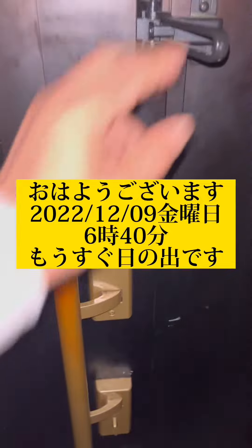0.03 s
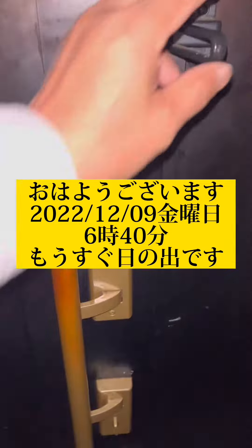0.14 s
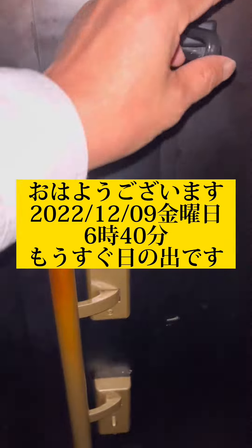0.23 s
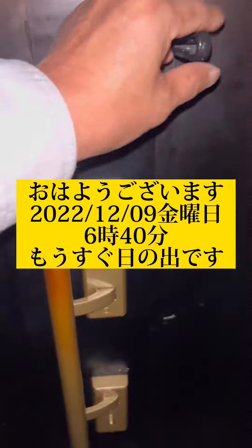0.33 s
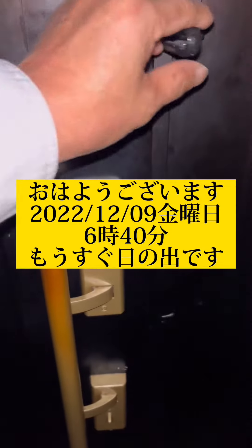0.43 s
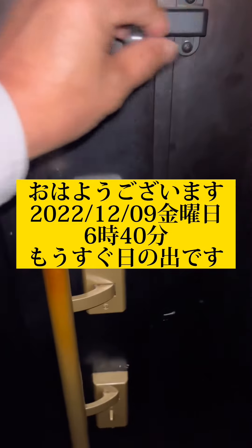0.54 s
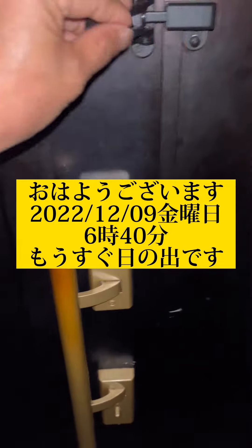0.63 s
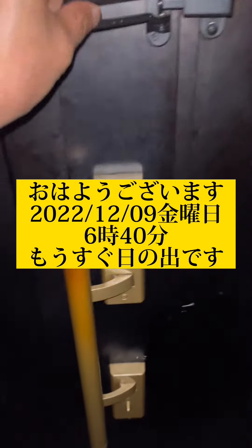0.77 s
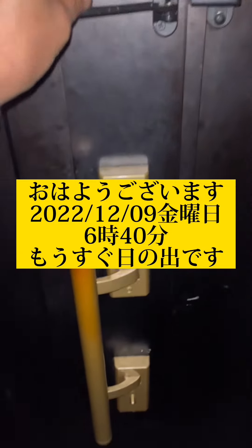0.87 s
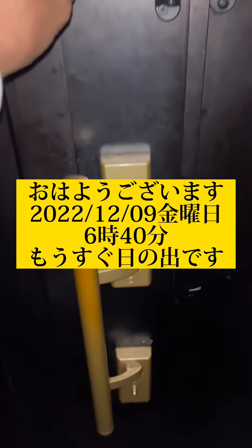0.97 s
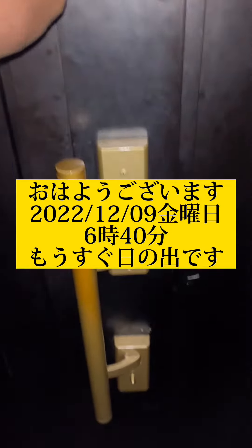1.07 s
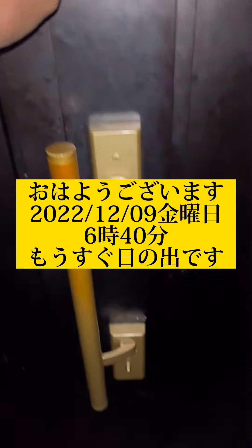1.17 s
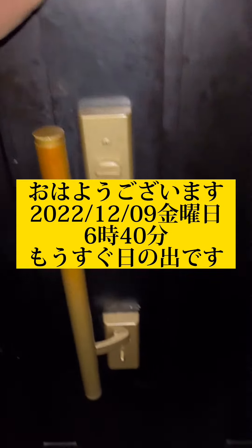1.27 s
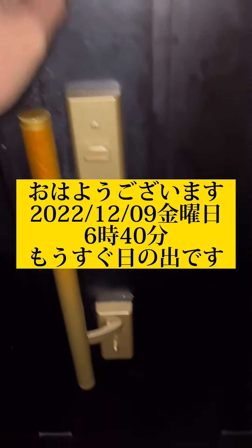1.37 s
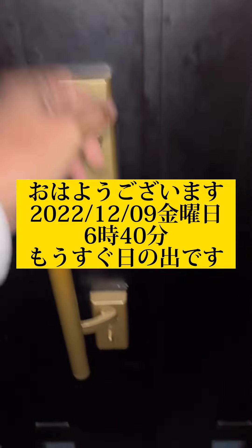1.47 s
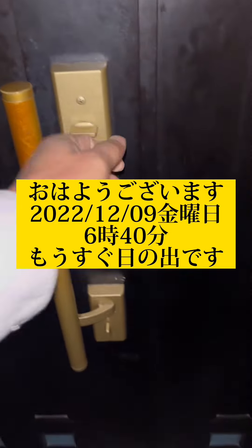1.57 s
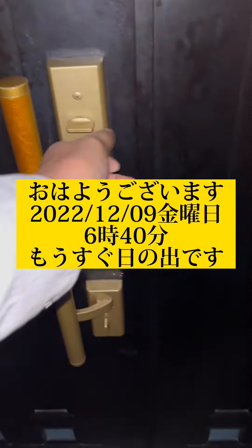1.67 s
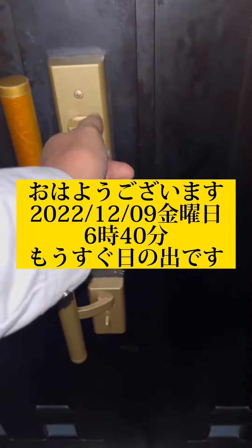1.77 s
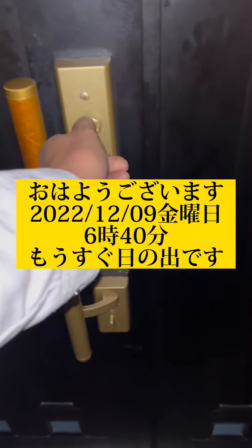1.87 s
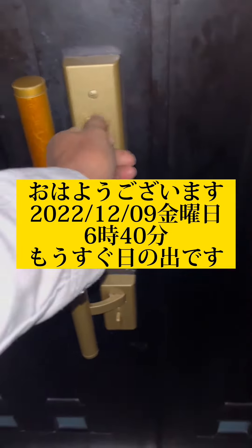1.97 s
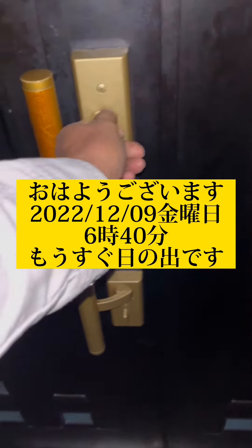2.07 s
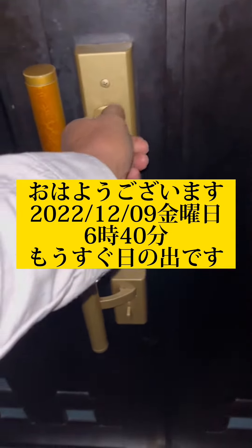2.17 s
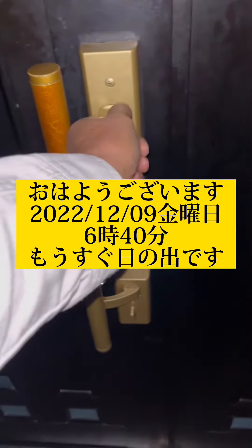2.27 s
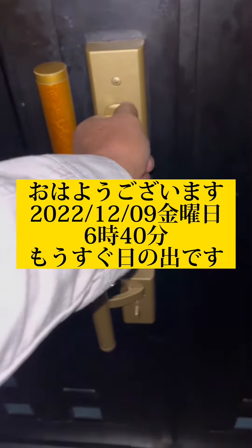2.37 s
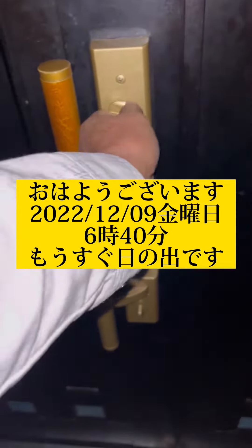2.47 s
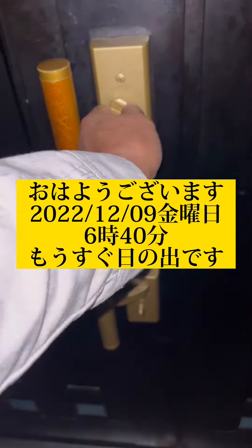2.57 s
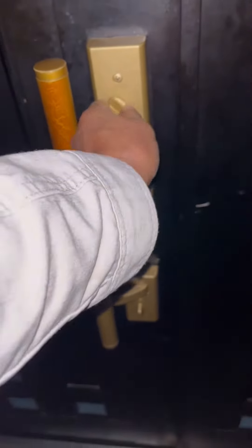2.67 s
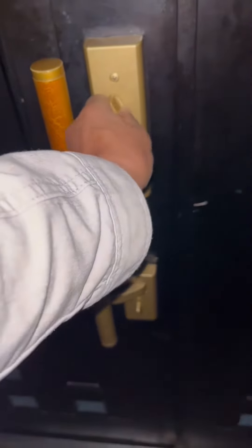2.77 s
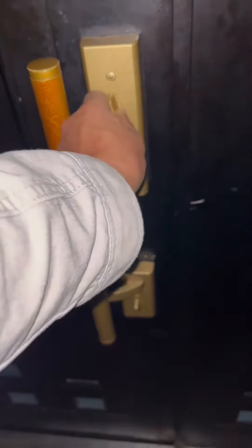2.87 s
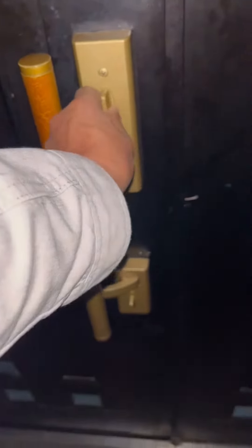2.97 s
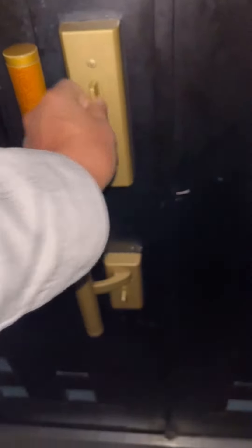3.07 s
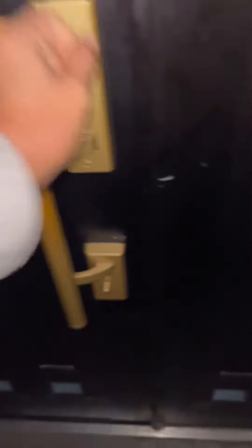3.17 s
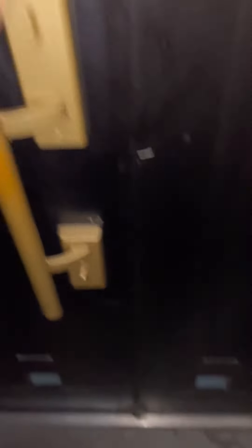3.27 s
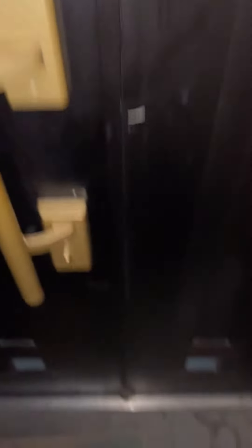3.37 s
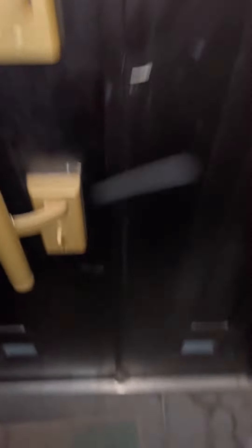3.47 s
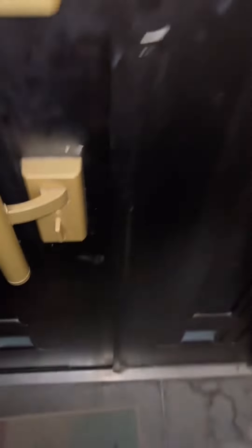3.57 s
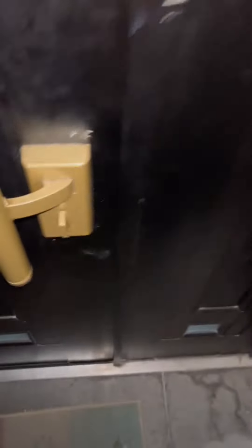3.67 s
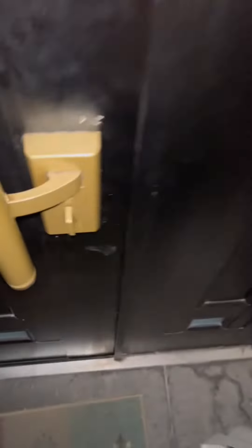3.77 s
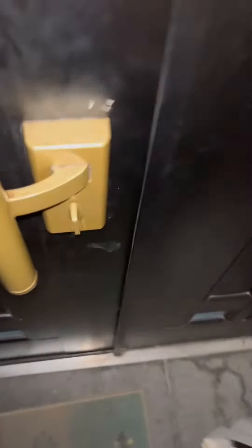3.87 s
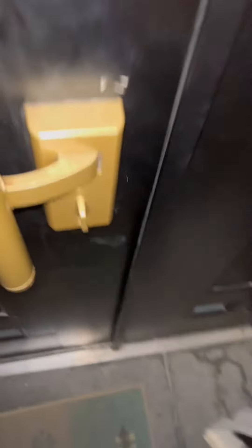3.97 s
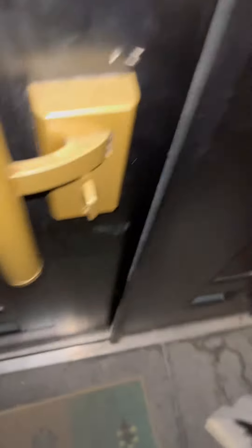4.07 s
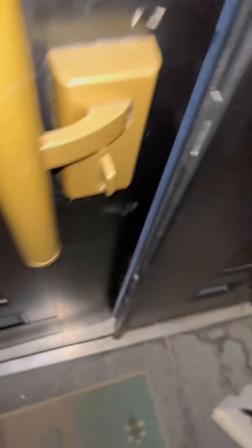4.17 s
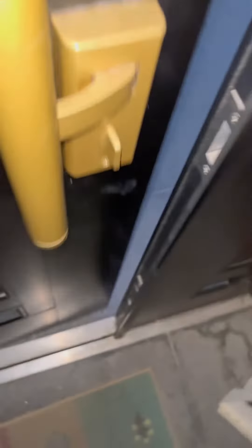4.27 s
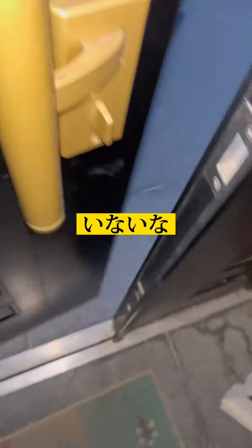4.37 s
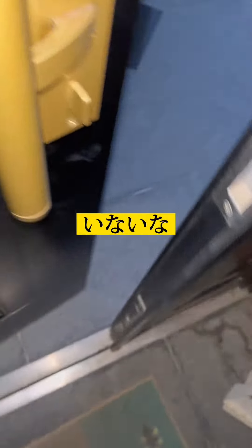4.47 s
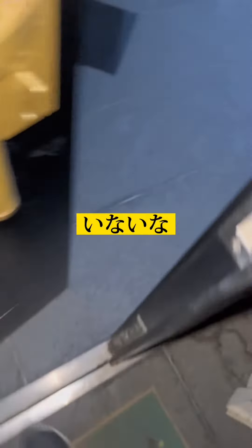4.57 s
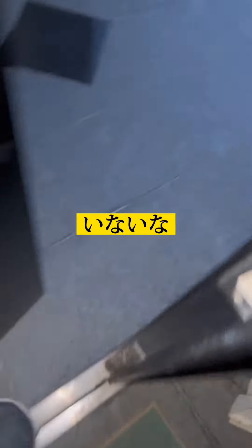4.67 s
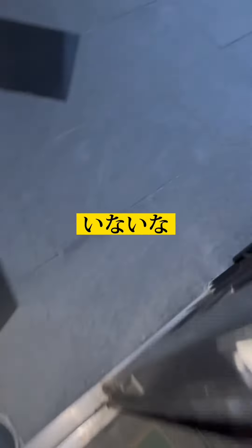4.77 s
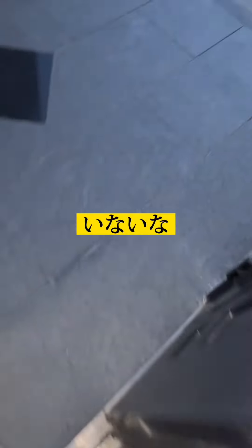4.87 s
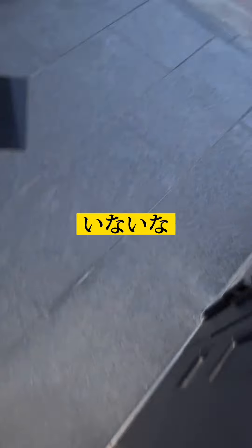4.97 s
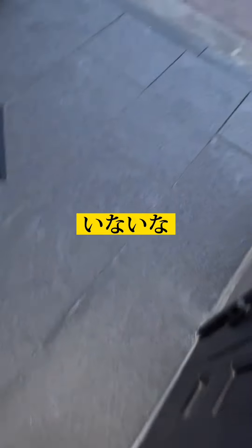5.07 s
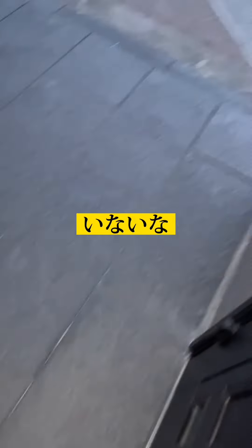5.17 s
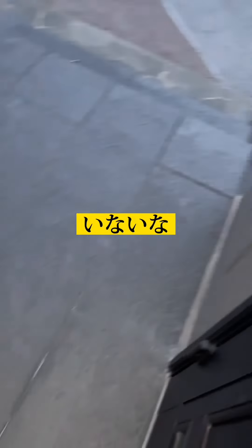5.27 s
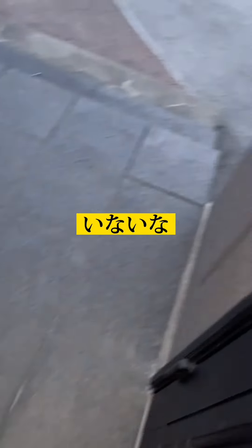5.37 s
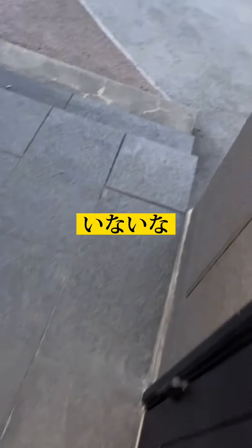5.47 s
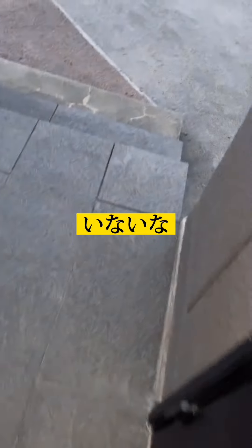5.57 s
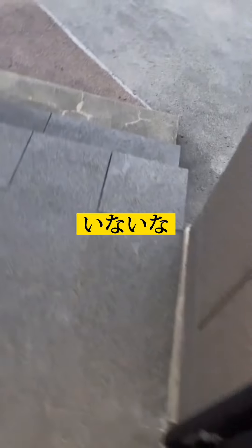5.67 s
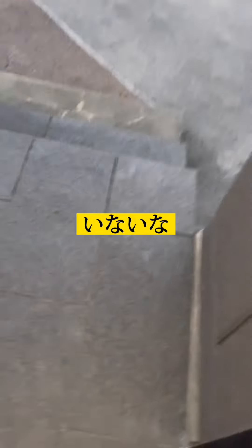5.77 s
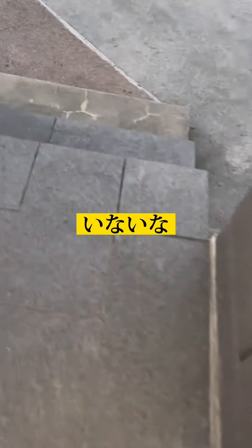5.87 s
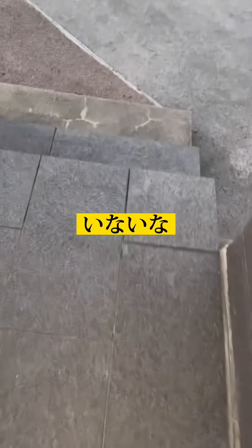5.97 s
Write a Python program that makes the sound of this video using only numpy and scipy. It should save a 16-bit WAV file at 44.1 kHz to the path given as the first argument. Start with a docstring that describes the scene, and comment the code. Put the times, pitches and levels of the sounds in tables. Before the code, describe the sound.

In a small hard entrance hall, heard close, fabric softly hisses and a swing guard knocks with a short ring. A thumb-turn ticks faintly and its bolt cracks home brightly. The handle clacks and rattles, a latch snaps with a heavy door thump, another latch springs back. Clothes swish, a hinge rubs dully, and low outdoor rumble is joined by a faint steady hum.

```python
"""A metal front door is unlocked and opened from a small, hard entrance hall.
The swing guard knocks back, the thumb-turn throws the bolt, the handle takes up its slack, the latches snap free.
Each blow is a bright crack, a dense noise tail and, for the larger parts, decaying modes; dragging is filtered noise.
The door leaf rumbles and thumps and its hinge rubs; clothes hiss and swish as noise that swells and dies away.
Outdoor rumble grows through the opening door, and a steady hum, a slowly wavering sine, sets in."""
import sys
import numpy as np
from scipy import signal
from scipy.fft import rfft, irfft
from scipy.io import wavfile
from scipy.ndimage import uniform_filter1d

SR = 44100
rng = np.random.default_rng(int(sys.argv[2]) if len(sys.argv) > 2 else 0)


def output_pcm(signal):
    """Save a mono or channel-first signal as 16-bit PCM at the path in sys.argv[1].

    Samples are clipped to [-1, 1] before scaling.
    """
    pcm = np.clip(np.atleast_2d(signal).T, -1, 1) * 32767
    wavfile.write(sys.argv[1], SR, np.round(pcm).astype(np.int16))


N = 265393
T = np.arange(N) / SR  # scene time, s
AGE = T[:SR * 3 // 4]  # time since a blow, s

# Spectra give relative density; modes give relative level. Both are scaled to rms 1 before use.

# Reverberation of the hall, before each blow's ring factor: frequency_hz, t60_s
HALL_T60 = [(100, 0.5), (300, 0.32), (700, 0.35), (2000, 0.23), (6000, 0.22), (10000, 0.15), (16000, 0.13)]

# Outdoor rumble: frequency_hz, density_db_per_hz
OUTDOOR_SPECTRUM = [(15, -84), (25, -8.5), (70, -1.5), (102, -6.5), (134, -6), (186, -10), (257, -8),
                    (307, -15.5), (574, -12), (667, -18), (1100, -18), (2930, -33), (3320, -28),
                    (10000, -48), (13000, -68), (22000, -120)]

# Soft hiss of fabric: frequency_hz, density_db_per_hz
FABRIC_HISS_SPECTRUM = [(59, -20.5), (100, 0.5), (239, -18.5), (389, -2.5), (705, -8), (950, -6.5),
                        (1580, -7.5), (2220, -10), (9210, -16), (14700, -22), (16000, -21)]
# Swish of clothes: frequency_hz, density_db_per_hz
SWISH_SPECTRUM = [(200, -10), (500, 1), (900, -6), (1400, 4), (2300, -0.5), (4000, -4.5), (8000, -15),
                  (16000, -30)]
# Swells and sustained stretches of soft fabric hiss: start_s, length_s, level_db
FABRIC_HISSES = [(-0.1, 0.27, -54), (0.77, 0.27, -67.5), (1.24, 0.31, -62.5), (1.59, 0.29, -58),
                 (1.95, 2.95, -65.5), (2.58, 0.33, -66), (3.1, 0.11, -62), (4.34, 0.2, -55.5),
                 (4.75, 0.75, -58), (5.6, 0.39, -72)]
# Swishes of clothes: start_s, length_s, level_db
SWISHES = [(3.295, 0.058, -55.5), (5.17, 0.065, -55), (5.26, 0.04, -49.5), (5.43, 0.2, -57.5),
           (5.785, 0.019, -50.5), (5.87, 0.15, -77)]

# Rub of the hinge: frequency_hz, density_db_per_hz
HINGE_SPECTRUM = [(80, -15), (170, -1), (300, -8.5), (517, 4), (700, -14), (920, -6.5), (1340, -19),
                  (2500, -34), (8000, -50)]
# Noise of the door leaf: frequency_hz, density_db_per_hz
LEAF_SPECTRUM = [(35, -46), (70, 15.5), (160, 11), (280, 3), (450, -2.5), (700, -34), (1500, -46)]
# Low rumbles of the door leaf, under the hand or stirred by a blow: start_s, length_s, level_db
LEAF_RUMBLES = [(0.34, 0.32, -68), (1.13, 0.29, -62.5), (2.41, 0.54, -66.5), (2.89, 0.17, -57.5),
                (3.58, 0.79, -48.5)]
# Dull thumps of the door leaf: start_s, level_db, pitch_hz
LEAF_THUMPS = [(3.701, -42, 114), (3.968, -32, 85.6), (3.979, -26.5, 159.3), (4.004, -32.5, 113),
               (4.247, -37, 273), (4.274, -32, 197), (4.301, -37, 106), (4.559, -31.5, 122),
               (4.581, -28, 79.3), (4.598, -32.5, 155), (4.629, -32.5, 77.5), (4.66, -40, 115),
               (5.56, -42.5, 265)]
# Soft bumps as the body shifts: start_s, level_db, pitch_hz
BODY_BUMPS = [(1.455, -54, 150), (3.205, -52, 118), (3.318, -52.5, 126), (3.41, -51.5, 101),
              (5.099, -39.5, 87)]

# Struck swing guard: frequency_hz, density_db_per_hz
GUARD_SPECTRUM = [(100, -41), (200, -11), (290, -4), (380, 3.5), (480, -6), (590, -14.5), (700, -7.5),
                  (860, -7), (980, -15), (1300, -14.5), (2100, -27), (2620, -15), (3050, -32), (3700, -29),
                  (7000, -41), (12000, -69)]
# Ringing of the guard: frequency_hz, level_db, t60_s
GUARD_MODES = [(280, -1.5, 0.94), (310, -12, 0.34), (379, 3, 0.44), (407, -1, 0.43), (685, -16, 0.22),
               (795, -20, .33), (1310, -10, 0.28), (1565, -14, 0.19), (2480, -5, 0.1), (2600, 7.5, 0.095),
               (2700, -2, 0.17)]

# Clack of the handle's linkage: frequency_hz, density_db_per_hz
LINKAGE_SPECTRUM = [(100, -13), (300, -6.5), (430, -10), (700, 1.5), (1050, -5), (1600, -12), (2250, -7),
                    (3300, -18), (4000, -18), (5000, -26.5), (7000, -29), (10000, -27), (12000, -43),
                    (16000, -47)]
# Ringing of the linkage: frequency_hz, level_db, t60_s
LINKAGE_MODES = [(687, -6, 0.28), (1037, -22, .15), (2200, -4, 0.093), (2450, -13, .1), (4270, -6, 0.057),
                 (5670, -11, 0.06), (6880, -7, 0.065), (7300, -11, 0.072), (9630, -7.5, 0.039)]
# Struck lock case: frequency_hz, density_db_per_hz
CASE_SPECTRUM = [(88, -36), (150, -31), (270, -1), (326, 1), (623, -2), (776, 0), (981, -13.5), (1120, -8),
                 (1280, -16), (1460, -9.5), (2260, -13.5), (5000, -23), (6500, -24), (11000, -120)]
# Ringing of the lock case: frequency_hz, level_db, t60_s
CASE_MODES = [(280.5, -0.5, 0.23), (477, -2, 0.3), (404, -5, 0.2), (587, -7.5, 0.4), (777, -6, 0.15),
              (1120, -1.5, 0.14), (1417, -10.5, 0.42), (1790, -6, 0.1)]
# Bright steel click, also the colour of the sleeve's brush: frequency_hz, density_db_per_hz
STEEL_SPECTRUM = [(1500, 1), (3000, 2.5), (4500, 1.5), (7000, 3.5), (10000, 2), (13000, -9), (16000, -11)]
# Clear rattles of handle and latch: start_s, case_level_db, click_level_db, main_resonance_hz
RATTLES = [(3.687, -36.5, -62, 705), (3.738, -39, -48.5, 1590), (3.771, -36.5, -53, 1415),
           (3.797, -41, -52, 1190), (3.864, -33, -52.5, 1112), (3.902, -30, -57, 1450),
           (3.981, -42, -38.5, 1006), (4.007, -60, -40.5, 990), (4.125, -39.5, -35.5, 1136),
           (4.159, -39.5, -42, 1065), (4.194, -44, -50.5, 1580), (4.2542, -39.5, -50, 564),
           (4.293, -43.5, -49.5, 426)]
# Friction of handle and latch: frequency_hz, density_db_per_hz
SLIDE_SPECTRUM = [(88, -32), (150, 4.5), (286, -3), (484, -4.5), (979, -9), (1900, -13), (2270, -20),
                  (3220, -18), (3700, -20), (4860, -23), (5250, -22), (13400, -30), (16000, -36)]
# Strokes in which handle and latch slide: start_s, length_s, level_db
SLIDES = [(3.678, 0.044, -44.5), (3.795, 0.044, -46), (3.9, 0.11, -34.5), (4.06, 0.055, -43.5),
          (4.165, 0.026, -44), (4.232, 0.091, -50)]

# Latch leaving the strike plate: frequency_hz, density_db_per_hz
LATCH_SPECTRUM = [(120, -38), (200, 11.5), (529, -18), (1300, -43), (1870, -28), (2290, -16), (4950, -12.5),
                  (6880, -12), (8580, -8.5), (9230, -14), (10500, -13), (14300, -18.5), (16000, -28)]
# Ringing of the strike plate: frequency_hz, level_db, t60_s
STRIKE_MODES = [(478.4, 9, 0.2), (1100, -11, 0.38), (1500, -24, .15), (1700, -3, 0.1), (5050, -9, 0.3),
                (6060, -4, 0.19), (7750, 3, 0.06), (8400, -6, .06), (10800, -7, .05)]
# Latch springing out again: frequency_hz, density_db_per_hz
REBOUND_SPECTRUM = [(70, -32), (130, -14), (280, -2), (410, -25), (500, -20), (650, -4), (850, -14.5),
                    (1250, -13), (1750, -19.5), (2500, -12), (3500, -21), (5000, -18.5), (7200, -14.5),
                    (9000, -21), (14500, -31), (16000, -42)]
# Ringing of the latch: frequency_hz, level_db, t60_s
LATCH_MODES = [(251.2, 1, 0.43), (359, 4.5, 0.27), (2510, -10, 0.31), (3920, -7, 0.19), (4760, -3, 0.15),
               (5070, -8, 0.25), (6950, -15, .14), (7397, 4, 0.056), (8050, -9, 0.082)]
# Light metal ticks and chinks: start_s, level_db, pitch_hz, t60_s
TICKS = [(1.302, -70.5, 9560, .04), (2.43, -65, 13500, .03), (2.821, -56, 1674, 0.14),
         (3.684, -47.5, 13700, 0.039), (3.789, -56, 13500, .04), (3.825, -61, 13800, .05),
         (4.062, -48.5, 5140, 0.046), (4.568, -49, 6120, 0.049), (4.896, -42, 3600, 0.025),
         (5.946, -61.5, 7470, 0.21)]

# Soft tick of the thumb-turn: frequency_hz, density_db_per_hz
SLIP_SPECTRUM = [(120, -10), (280, -20), (450, 3.5), (680, -15), (900, -37), (2000, -42), (6000, -31)]
# Knocking tumbler: frequency_hz, density_db_per_hz
TUMBLER_SPECTRUM = [(100, -22), (200, -10), (300, -1.5), (420, -12), (650, 2.5), (850, -8.5), (1050, -18),
                    (1280, -16), (1750, -46), (3000, -56), (6000, -59)]
# Dull knocks of the thumb-turn: start_s, level_db
TUMBLER_KNOCKS = [(2.4265, -43.5), (2.4427, -42.5)]
# Cam of the lock: frequency_hz, density_db_per_hz
CAM_SPECTRUM = [(150, -16), (330, 3), (680, 4.5), (950, 0.5), (1300, 0.5), (1700, -8), (2200, -2.5),
                (3000, -12.5), (4000, -10), (6000, -22), (8000, -24), (16000, -45)]
# Struck bolt: frequency_hz, density_db_per_hz
BOLT_SPECTRUM = [(100, -67), (250, -5.5), (450, -0.5), (650, 2), (880, -4), (1080, -6.5), (1500, -11.5),
                 (2100, -8), (2450, -12), (3200, -5.5), (4000, -4.5), (5300, -5.5), (5900, -12),
                 (6400, 2.5), (6900, -9.5), (9000, -9.5), (16000, -23.5)]
# Ringing of the bolt: frequency_hz, level_db, t60_s
BOLT_MODES = [(480, -3, 0.17), (602, -6, 0.31), (708, -3, 0.24), (1048, -18, 0.23), (2100, -10, 0.38),
              (3200, -2, 0.14), (3620, -19, 0.11), (4390, -7, 0.34), (5067, -11, 0.39), (5233, 0.5, 0.3),
              (5470, 0, 0.2), (5950, -7, 0.19), (6380, 1.5, 0.33), (6400, -7, 0.26), (6550, -9, 0.22),
              (6934, -10, 0.18), (7200, -8, 0.28), (8500, -8, 0.32), (9400, -13, 0.32)]
# Friction of guard and thumb-turn: frequency_hz, density_db_per_hz
DRAG_SPECTRUM = [(150, -28), (260, 5), (400, -11), (580, 3), (800, -10), (1200, -16), (1720, -16),
                 (2400, -26), (4300, -23), (9000, -20.5), (16000, -28)]
# Strokes in which guard and thumb-turn drag: start_s, length_s, level_db
DRAGS = [(0.0, 0.44, -65), (0.53, 0.046, -67), (2.3, 0.052, -59.5), (2.55, 0.18, -59), (2.69, 0.14, -53)]

OPEN_S, SWING_S = 3.9, 0.96  # the leaf leaves its frame; duration of its swing
SHUT_DB, OPENING_DB = -69, -48.5  # rumble gain when shut; gain added by the full opening
HUM_HZ, HUM_S, HUM_RISE_S, HUM_DB = 102.4, 5.37, 0.064, -47  # centre pitch, start, rise, mid level
HISS_FLOOR_DB, HISS_ATTACK_S, HISS_T60_S = -79.5, 0.11, 0.85  # constant gain under the swells
SWISH_ATTACK_S, SWISH_T60_S = 0.027, 0.47
SLEEVE_S, SLEEVE_HOLD_S, SLEEVE_DB = 5.788, 0.018, -44.5
HINGE_S, HINGE_HOLD_S, HINGE_DB = 4.9, 0.12, -46
RUMBLE_ATTACK_S, RUMBLE_T60_S = 0.022, 0.47
THUMP_T60_S, BUMP_T60_S = 0.18, 0.063
SLIDE_ATTACK_S, SLIDE_T60_S = 0.02, 0.52
LOOSE_PER_S, LOOSE_DB, LOOSE_SPREAD_DB = 30, -12, 2.5  # faint rattles, level relative to the sliding
WIND_S, WIND_END_S, WIND_DB, WIND_DB_PER_S = 2.167, 2.36, -62.5, 15  # WIND_DB: first tick
WIND_TICKS_PER_S, WIND_JITTER_S = 26, 0.0064  # jitter is the largest shift either way
DRAG_ATTACK_S, DRAG_T60_S = 0.054, 0.43
EDGE_HZ = 16100  # upper band limit


def amp(db):
    """Decibel law: 20 dB is a factor of ten in amplitude."""
    return 10 ** (np.asarray(db) / 20)


def evened(x, size=None):
    """Normalization to rms 1, over the first samples if a size is given."""
    return x / np.sqrt(np.mean(x[:size] ** 2) + 1e-20)


def read(points, hz):
    """Interpolation of a tabulated curve on a log-frequency axis."""
    f, value = np.transpose(points)
    return np.interp(np.log(hz + 1), np.log(f), value)


def add(mix, s, sound):
    """Superposition: a sound is summed into the mix at s seconds."""
    part = mix[round(s * SR):][:len(sound)]
    part += sound[:len(part)]


def coloured(x, spectrum, size=4096):
    """Minimum-phase filtering: a causal response of given spectrum keeps attacks sharp."""
    hz = abs(np.fft.fftfreq(size, 1 / SR))
    gain_db = np.maximum(read(spectrum, hz), -100)
    log_gain = np.log(amp(gain_db))
    # the Hilbert transform of the log gain supplies the phase
    response = np.exp(np.conj(signal.hilbert(log_gain)))
    taps = np.fft.ifft(response).real
    return signal.oaconvolve(x, taps[:size // 2])[:len(x)]


def drift(rate_hz):
    """Low-passed noise: a slow random wander of rms 1."""
    hz = np.fft.rfftfreq(N, 1 / SR)
    spectrum = rfft(rng.standard_normal(N))
    return evened(irfft(spectrum * np.exp(-(hz / rate_hz) ** 2), N))


def strokes(rows, attack_s, t60):
    """Power addition of gains: each swells smoothly, holds and decays exponentially."""
    power = np.zeros(N)
    for start, length, db in rows:
        swell = np.sin(np.pi / 2 * np.clip((T - start) / attack_s, 0, 1)) ** 2
        since_end = np.clip(T - start - length, 0, 2 * t60)
        power += (swell * amp(db - 60 * since_end / t60)) ** 2
    return np.sqrt(power)


def tail(ring=1, patchy_db=4.5, size=512):
    """Dense reverberation: uneven in pitch, with treble decaying sooner than bass."""
    hz, t, z = signal.stft(rng.standard_normal(len(AGE)), SR, nperseg=size)
    uneven = np.clip(rng.standard_normal((len(hz), 1)), -2, 2)
    uneven_db = patchy_db * uneven * np.minimum(hz / 2000, 1)[:, None]
    decay_db = -60 * t / (ring * read(HALL_T60, hz)[:, None])
    return signal.istft(z * amp(uneven_db + decay_db), SR, nperseg=size)[1][:len(AGE)]


def blow(spectrum, crack_db, crack_s, ring, size=1024):
    """Impact excitation: a crack of chattering metal and a dense tail, coloured by the struck part."""
    chatter = rng.choice([-1, 1], len(AGE)) * (AGE / crack_s) * np.exp(1 - AGE / crack_s)
    crack = signal.lfilter(*signal.butter(1, 1200, "high", fs=SR), chatter)
    build_up = 1 - np.exp(-AGE / 0.0051)
    excitation = amp(crack_db) * crack + build_up * tail(ring)
    return evened(coloured(excitation, spectrum), size)


def ringing(modes, blur=0.37):
    """Modal superposition: decaying sines, each blurred by its own reflections."""
    out = np.zeros(len(AGE))
    for hz, db, t60 in modes:
        in_phase, quadrature = evened(uniform_filter1d(rng.standard_normal((2, len(AGE))), size=500))
        turn = 2 * np.pi * hz * AGE
        wave = (1 + blur * in_phase) * np.sin(turn) + blur * quadrature * np.cos(turn)
        out += amp(db - 60 * AGE / t60) * wave
    return evened(out, size=1024)


def ping(hz, t60, spread=.08, count=5):
    """Close modes rung by one tap: a tight cluster of sines decays together."""
    cluster = hz * (1 + spread * rng.uniform(-0.836, 1, (count, 1)))
    waves = np.sin(2 * np.pi * (cluster * AGE + rng.random((count, 1)))).sum(0)
    attack = 1 - np.exp(-AGE / 0.00021)
    return evened(waves * amp(-60 * AGE / t60) * attack, size=512)


def thump(hz, t60):
    """Damped oscillation: a low push swings the leaf as a sine and stirs it as coloured noise."""
    fade = amp(-60 * AGE / t60) * (1 - np.exp(-AGE / 0.00055))
    swing = evened(fade * np.sin(2 * np.pi * hz * AGE), size=1024)
    stir = evened(coloured(fade * rng.standard_normal(len(AGE)), LEAF_SPECTRUM), size=1024)
    return amp(-2.0) * swing + amp(-6.5) * stir


def background():
    """Transmission through an opening: rumble grows with the gap; a distant machine starts to hum."""
    gap = np.clip((T - OPEN_S) / SWING_S, 0, 1)
    passed = amp(SHUT_DB) + gap * amp(OPENING_DB)
    outdoors = evened(coloured(rng.standard_normal(N), OUTDOOR_SPECTRUM))
    rumble = passed * amp(2.9 * drift(11.7)) * outdoors
    running = amp(HUM_DB) * np.clip((T - HUM_S) / HUM_RISE_S, 0, 1)
    pitch_hz = HUM_HZ + 0.93 * drift(4.9)
    tone = evened(np.sin(2 * np.pi * np.cumsum(pitch_hz) / SR))
    return rumble + running * amp(0.5 * drift(8.7)) * tone


def clothes():
    """Friction noise of fabric: a soft hiss swells, clothes swish and a sleeve brushes in fine grains."""
    hiss_gain = amp(HISS_FLOOR_DB) + strokes(FABRIC_HISSES, HISS_ATTACK_S, HISS_T60_S)
    hiss = hiss_gain * evened(coloured(rng.standard_normal(N), FABRIC_HISS_SPECTRUM))
    folds = amp(2.1 * drift(65)) * rng.standard_normal(N)
    swish = strokes(SWISHES, SWISH_ATTACK_S, SWISH_T60_S) * evened(coloured(folds, SWISH_SPECTRUM))
    grains = amp(1.6 * drift(130)) * rng.standard_normal(N)
    brush = strokes([(SLEEVE_S, SLEEVE_HOLD_S, SLEEVE_DB)], attack_s=0.003, t60=0.2)
    return hiss + swish + brush * evened(coloured(grains, STEEL_SPECTRUM))


def hinge():
    """Dry friction: the hinge rubs dully, with a fluctuating grip, at the end of the swing."""
    grip = amp(1.3 * drift(40))
    rub = evened(coloured(grip * rng.standard_normal(N), HINGE_SPECTRUM))
    return rub * strokes([(HINGE_S, HINGE_HOLD_S, HINGE_DB)], attack_s=0.036, t60=0.29)


def thumps():
    """Plate excitation: the leaf rumbles under the hand or a blow and thumps; soft bumps die sooner."""
    rumble = evened(coloured(rng.standard_normal(N), LEAF_SPECTRUM))
    out = strokes(LEAF_RUMBLES, RUMBLE_ATTACK_S, RUMBLE_T60_S) * rumble
    for rows, t60 in (LEAF_THUMPS, THUMP_T60_S), (BODY_BUMPS, BUMP_T60_S):
        for s, db, hz in rows:
            add(out, s, amp(db) * thump(hz, t60))
    return out


def guard():
    """Impact on a stop: the swing guard knocks and rings the door in its modes."""
    out = np.zeros(N)
    knock = blow(GUARD_SPECTRUM, crack_db=7.0, crack_s=0.0017, ring=1.24)
    add(out, 1.099, amp(-38.0) * knock + amp(-41.5) * ringing(GUARD_MODES))
    return out


def handle():
    """Impact and friction: the linkage clacks, loose parts rattle in the case and slide unevenly."""
    out = np.zeros(N)
    clack = blow(LINKAGE_SPECTRUM, crack_db=12.5, crack_s=0.0011, ring=1.0)
    add(out, 3.5605, amp(-38.0) * clack + amp(-46) * ringing(LINKAGE_MODES))
    for s, case_db, click_db, hz in RATTLES:
        case = blow(CASE_SPECTRUM, crack_db=0.0, crack_s=0.0023, ring=0.84, size=512)
        body = amp(-5.5) * case + amp(-7.5) * ringing(CASE_MODES)
        knock = body + amp(-4) * ping(hz, t60=0.091, spread=0.136)
        click = blow(STEEL_SPECTRUM, crack_db=6.5, crack_s=0.0016, ring=0.5, size=512)
        add(out, s, amp(case_db) * knock + amp(click_db) * click)
    sliding = strokes(SLIDES, SLIDE_ATTACK_S, SLIDE_T60_S)
    grip = amp(2.84 * drift(78))
    out += sliding * evened(coloured(grip * rng.standard_normal(N), SLIDE_SPECTRUM))
    # sparse random taps ring the case while the parts slide
    struck = rng.random(N) < LOOSE_PER_S / SR
    taps = struck * amp(LOOSE_DB + LOOSE_SPREAD_DB * rng.standard_normal(N))
    return out + signal.oaconvolve(sliding * taps, ringing(CASE_MODES))[:N]


def latches():
    """Release of a loaded spring: a latch snaps off the plate, later springs out; small parts tick."""
    out = np.zeros(N)
    snap = blow(LATCH_SPECTRUM, crack_db=15.0, crack_s=0.0018, ring=1.3)
    add(out, 3.9595, amp(-28.0) * snap + amp(-30) * ringing(STRIKE_MODES))
    add(out, 3.965, amp(-33.5) * blow(LATCH_SPECTRUM, crack_db=16, crack_s=0.0021, ring=0.45))
    rebound = blow(REBOUND_SPECTRUM, crack_db=10.0, crack_s=0.0029, ring=0.86)
    add(out, 4.7022, amp(-28.5) * rebound + amp(-35.5) * ringing(LATCH_MODES))
    for s, db, hz, t60 in TICKS:
        chink = ping(hz, t60, spread=0.073, count=7)
        click = blow(STEEL_SPECTRUM, crack_db=0.5, crack_s=0.0011, ring=0.3, size=512)
        add(out, s, amp(db) * (amp(0.5) * chink + amp(-1.5) * click))
    return out


def lock():
    """Friction, then impact: the wound thumb-turn ticks and knocks; the sprung bolt snaps and rings."""
    grip = amp(1.6 * drift(60))
    friction = evened(coloured(grip * rng.standard_normal(N), DRAG_SPECTRUM))
    out = strokes(DRAGS, DRAG_ATTACK_S, DRAG_T60_S) * friction
    # the thumb-turn slips harder as its spring is wound
    for s in np.arange(WIND_S, WIND_END_S, 1 / WIND_TICKS_PER_S):
        slip = blow(SLIP_SPECTRUM, crack_db=5, crack_s=0.0022, ring=0.24)
        jitter_s = WIND_JITTER_S * (2 * rng.random() - 1)
        add(out, s + jitter_s, amp(WIND_DB + WIND_DB_PER_S * (s - WIND_S)) * slip)
    for s, db in TUMBLER_KNOCKS:
        add(out, s, amp(db) * blow(TUMBLER_SPECTRUM, crack_db=12.5, crack_s=0.0019, ring=0.96))
    add(out, 2.527, amp(-45.5) * blow(CAM_SPECTRUM, crack_db=2, crack_s=0.0032, ring=0.86))
    # the spring tips over, then the bolt strikes
    add(out, 2.894, amp(-56) * blow(BOLT_SPECTRUM, crack_db=4, crack_s=0.001, ring=.5))
    strike = blow(BOLT_SPECTRUM, crack_db=7, crack_s=0.0024, ring=0.99)
    add(out, 2.899, amp(-28.5) * strike + amp(-36.5) * ringing(BOLT_MODES, blur=0.78))
    return out


def scene():
    """Linear superposition of all sources in one channel."""
    surroundings = background() + clothes()
    door = hinge() + thumps()
    metalwork = guard() + handle() + latches() + lock()
    return (surroundings + door + metalwork)[None]


def record(dry):
    """Band limitation: the microphone's bass roll-off and an upper cutoff."""
    thin = signal.sosfilt(signal.butter(8, 41, "high", fs=SR, output="sos"), dry)
    low_pass = signal.firwin(511, EDGE_HZ, window=("kaiser", 9), fs=SR)
    return signal.oaconvolve(thin, low_pass[None], "same")


dry = scene()
out = record(dry)
output_pcm(out)
```